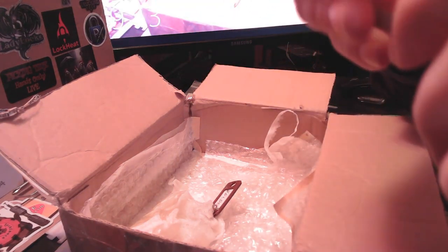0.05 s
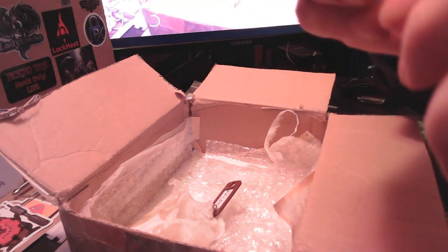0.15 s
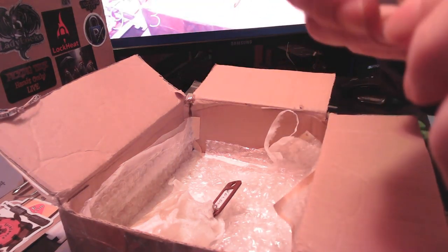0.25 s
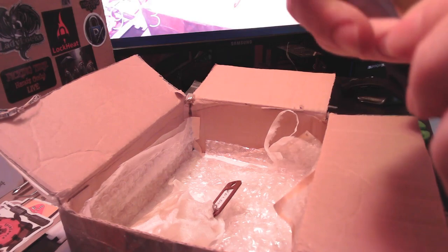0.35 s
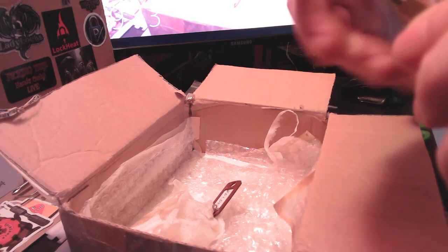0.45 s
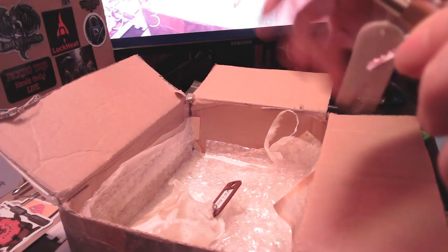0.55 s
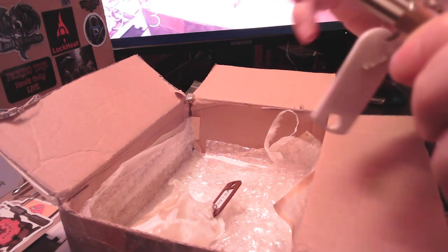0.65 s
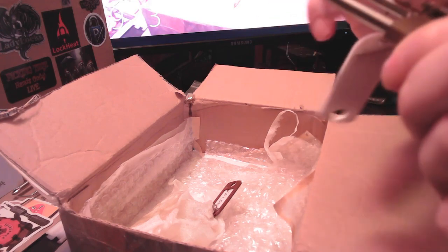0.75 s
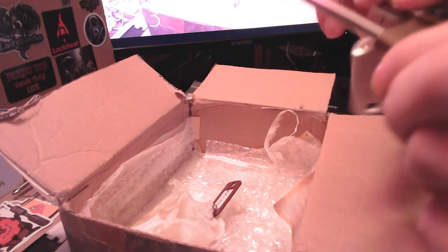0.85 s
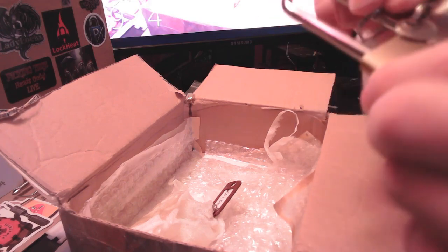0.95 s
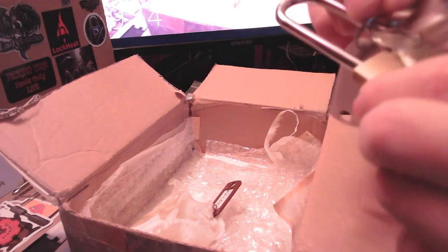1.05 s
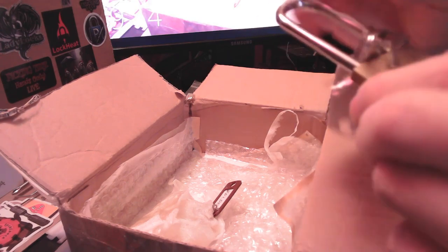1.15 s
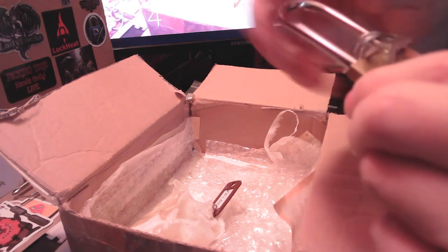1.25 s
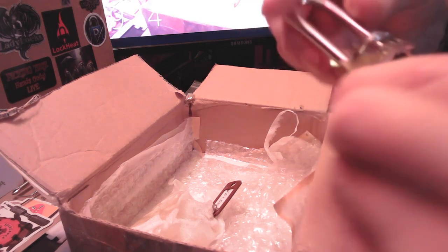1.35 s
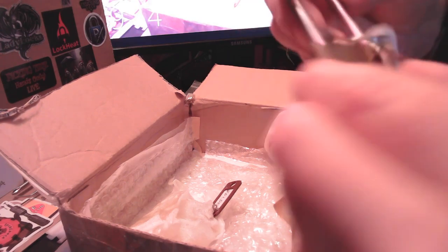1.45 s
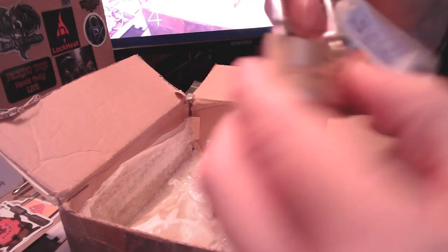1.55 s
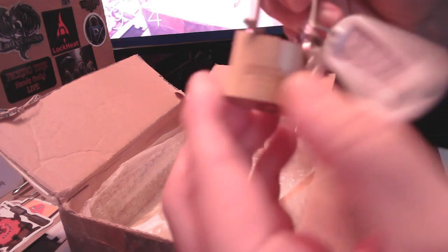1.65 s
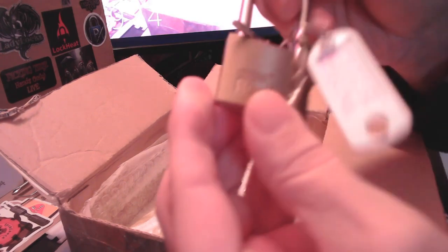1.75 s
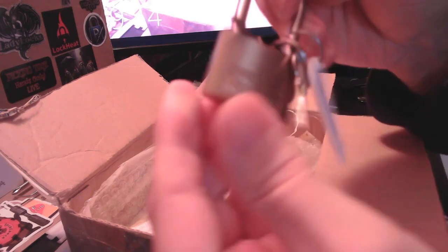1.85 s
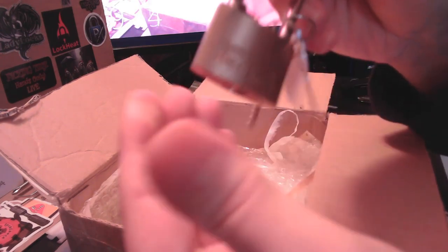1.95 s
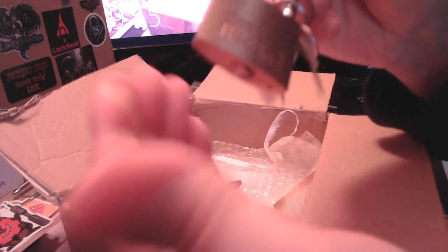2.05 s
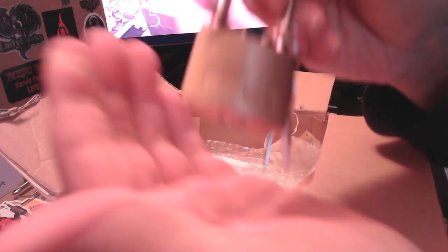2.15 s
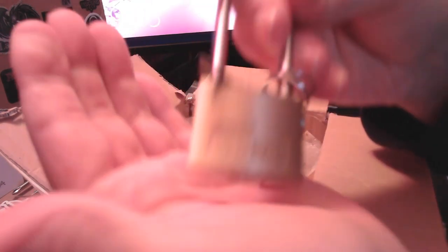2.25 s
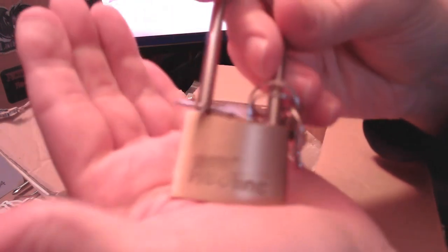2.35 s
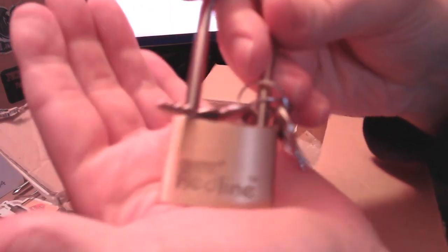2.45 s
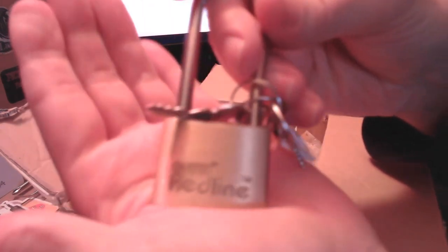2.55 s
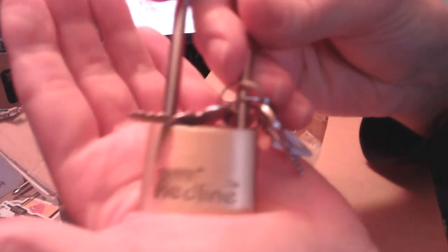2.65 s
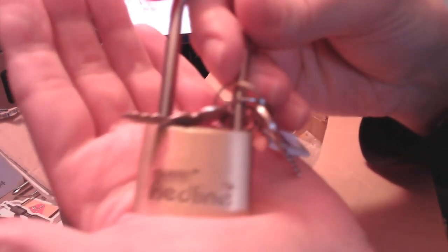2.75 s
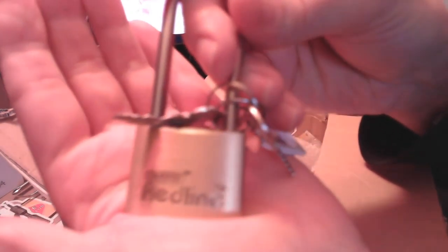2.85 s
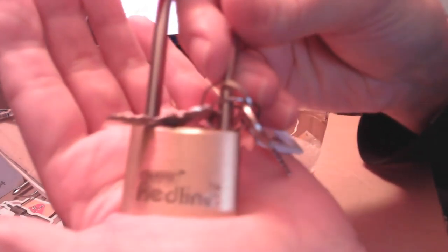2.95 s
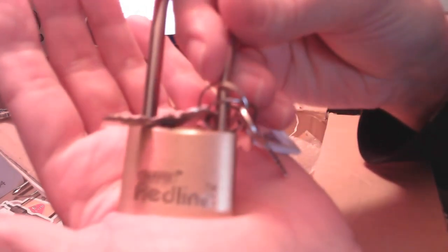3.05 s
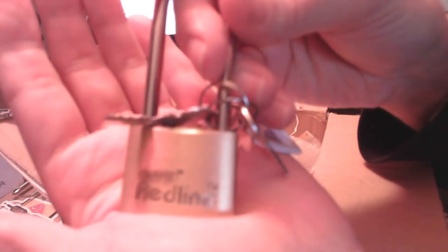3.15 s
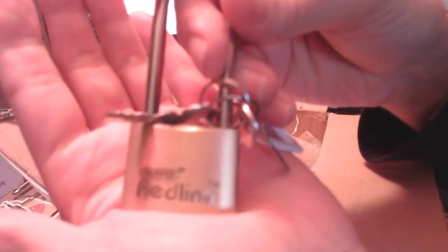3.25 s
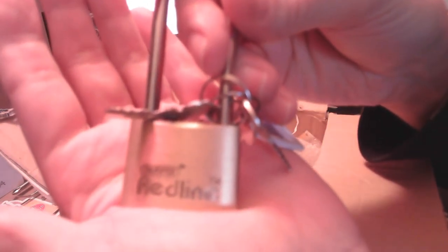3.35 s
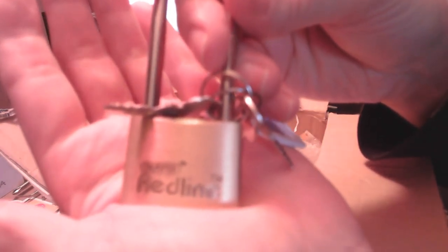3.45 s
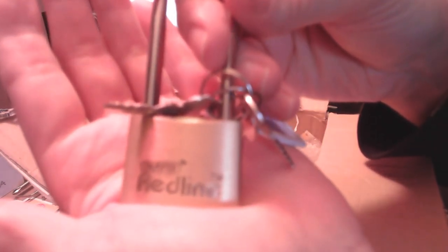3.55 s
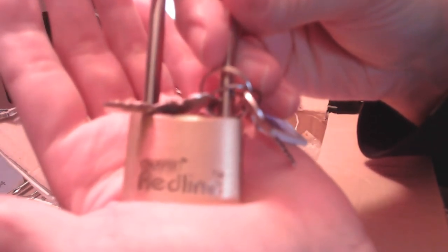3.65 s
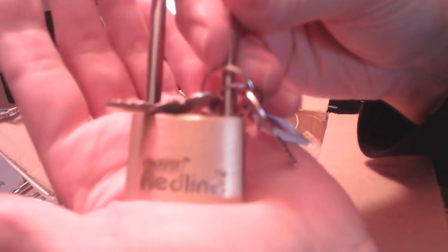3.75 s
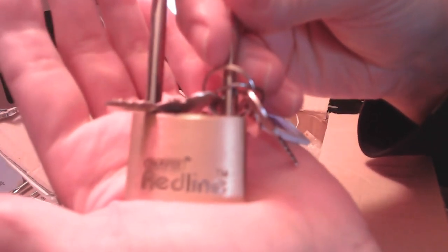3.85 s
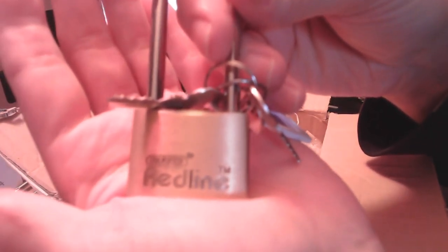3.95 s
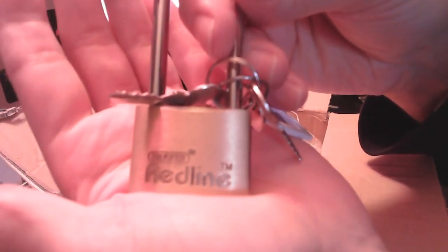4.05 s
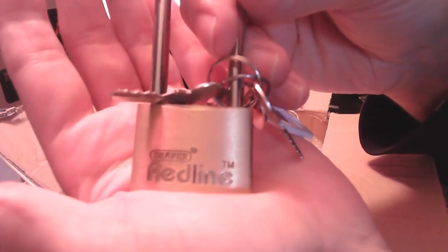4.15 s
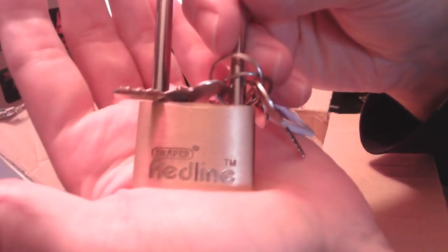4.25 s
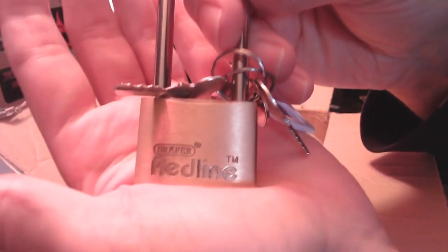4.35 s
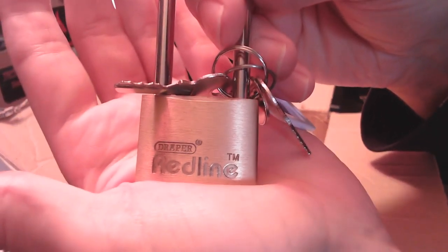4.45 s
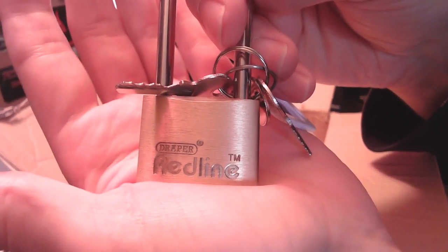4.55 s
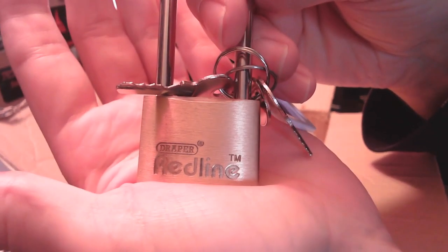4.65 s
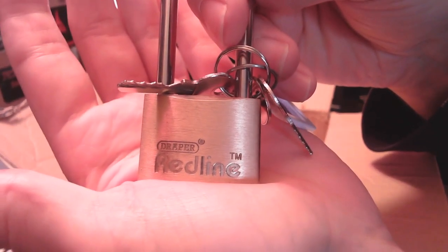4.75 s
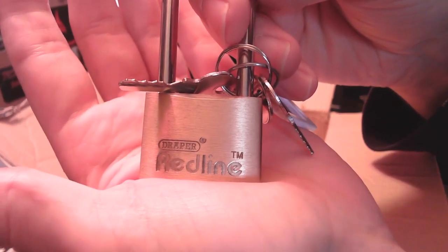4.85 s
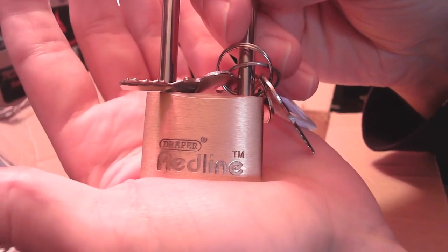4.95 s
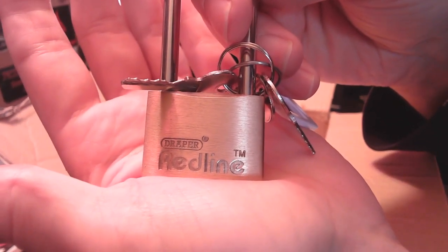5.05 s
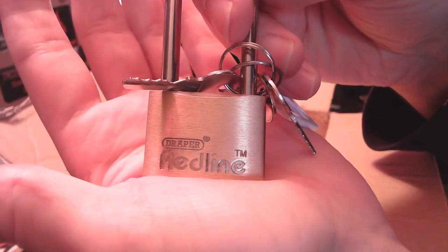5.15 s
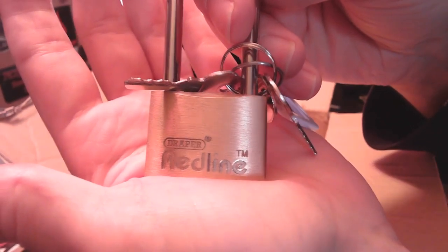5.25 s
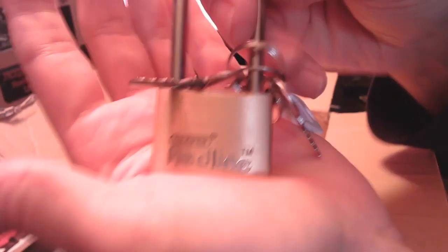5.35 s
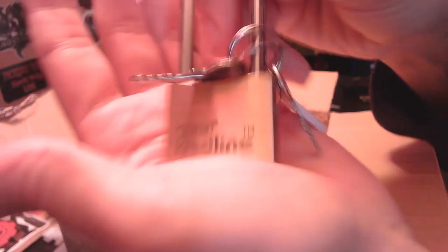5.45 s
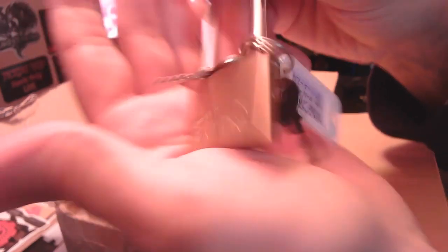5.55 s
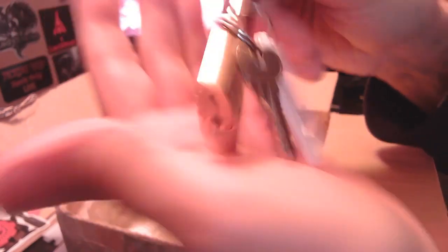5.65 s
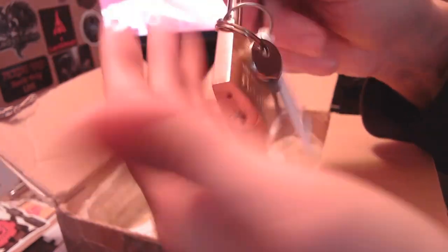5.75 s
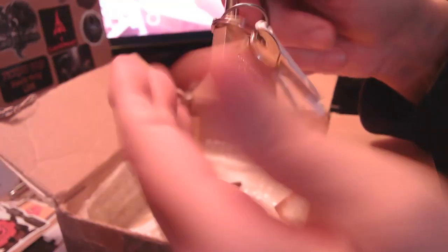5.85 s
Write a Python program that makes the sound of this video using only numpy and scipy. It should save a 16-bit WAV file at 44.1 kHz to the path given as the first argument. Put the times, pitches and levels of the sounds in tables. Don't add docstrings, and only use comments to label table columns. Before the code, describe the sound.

Small thin keys on a ring jingle and click sharply against a brass padlock, pause, then rattle again over a faint room hum.

```python
import sys
import numpy as np
from scipy import signal
from scipy.fft import rfft, irfft, next_fast_len
from scipy.io import wavfile
from scipy.ndimage import uniform_filter1d, map_coordinates

SR = 44100
rng = np.random.default_rng(int(sys.argv[2]) if len(sys.argv) > 2 else 0)


def put_to_file(sound):
    columns = np.atleast_2d(sound).T
    safe = np.clip(columns, -1, 1)
    whole_steps = np.round(safe * 32767)
    wavfile.write(sys.argv[1], SR, whole_steps.astype(np.int16))


def invert_db(x):
    u = np.asarray(x, float) / 20
    return 10 ** u


N = 260039

# pitch_hz, level_db (per Hz)
AIR_COLOUR = [(15, -58), (25, -2), (108, -7), (167, -11.5), (273, -13), (358, -11.5), (422, -16.5),
              (1060, -23.5), (1150, -24), (1470, -25), (1980, -28.5), (2150, -28.5), (2330, -30.5),
              (13300, -48), (16500, -48)]
AIR_DB = -53.5
# pitch_hz, likeness (1 = the same)
LIKENESS = [(60, 0.48), (180, 0.94), (550, 0.87), (1650, 0.58), (4970, 0.34), (15000, -2.5)]
# pitch_hz, level_db, waver_db
HUM_TONES = [(59.5, -61, 1.5), (118.6, -66, .8), (120.4, -54, .8), (360.8, -54, .5), (619, -76, 1.5),
             (722, -80, 1.5), (1082, -79, 1.5), (1443, -80, 1.5), (1803, -84, 1.5), (2116, -80, 1.5),
             (7833, -99, 1.5)]
# pitch_hz, width_hz, level_db
DRONES = [(44.5, 5.3, -53), (75.24, 2, -55.5), (87.7, 10, -62), (199, 5, -74), (12970, 530, -100)]

# start_s, level_db, hold_s
JOLTS = [
    (0, -29.5, .02),
    (0.642, -30, 0.047),
    (1.237, -32.5, 0.068),
    (1.942, -36.5, .04),
    (2.97, -41.5, 0.0099),
    (4.097, -44, 0.011),
    (4.926, -36, 0.062),
    (5.603, -29.5, 0.033),
]
DESK_HZ, DESK_REST_DB = 17.5, -55
JOLT_RISE_DB_S, JOLT_FALL_DB_S = 120, 79.5

# start_s, peak_s,
# end_s, scrape_db, ring_db
SWINGS = [(.06, 0.127, .27, -68, -79), (.33, 0.445, .47, -63, -67), (0.46, 0.477, .55, -59, -54),
          (0.49, 0.537, .6, -57, -41), (.55, 0.62, 0.696, -60, -47), (.67, 0.75, .84, -56.5, -50),
          (0.844, .865, 0.895, -55, -56), (.92, .93, 0.97, -61, -57), (1.0, 1.043, 1.0958, -72, -80),
          (1.162, 1.24, 1.318, -50.5, -45.5), (1.32, 1.385, 1.4022, -56.5, -52),
          (1.405, 1.408, 1.45, -58, -49), (1.406, 1.471, 1.539, -46.5, -24.5),
          (1.47, 1.505, 1.637, -51.5, -38), (1.644, 1.659, 1.7233, -53, -45),
          (1.67, 1.813, 1.875, -51.5, -51), (1.88, 1.887, 1.974, -54.5, -57),
          (1.94, 1.96, 2.036, -53.5, -77), (2.028, 2.173, 2.199, -60, -74),
          (2.194, 2.21, 2.297, -55.5, -41), (2.323, 2.34, 2.4073, -58, -72),
            (2.396, 2.47, 2.547, -53.5, -60), (2.53, 2.585, 2.603, -50, -75),
            (2.594, 2.617, 2.683, -45, -60), (2.64, 2.69, 2.7315, -47.5, -62),
            (2.62, 2.725, 2.795, -57.5, -51), (2.8, 2.9, 3.3, -66, -86), (3.6, 3.67, 3.7697, -65.5, -97),
            (5.02, 5.06, 5.105, -72, -99), (5.636, 5.739, 5.8, -49, -57), (5.805, 5.813, 6.1, -47.5, -35.5)]
SCRAPE_EDGE_DB, RING_EDGE_DB = 12, 22.5
START_STEEP, STILL_STEEP = 15, 2.6
# pitch_hz, level_db (per Hz)
SCRAPE_COLOUR = [(700, -22), (1500, 1), (3000, 2.5), (4500, 2.5), (6500, 2.5), (10000, -3), (13000, -4),
                 (15600, -3)]

# pitch_hz, level_db, t60_s (while rattling)
BOWS = [(11990, -4, .2), (12060, -5, .15), (12150, -2, .12), (12330, -10, .1), (12480, -4, .18),
        (12545, -3, .2), (12650, -2, .15), (12710, -3, .15), (13050, -12, .1)]
# pitch_hz, level_db, t60_s (while rattling)
BLADES = [(10340, -6, .15), (10540, -6, .1), (10600, 0, .15)]
# pitch_hz, level_db, t60_s (while rattling)
BENDS = [(3650, -5, .04), (3730, -2, .06), (3850, 0, .06), (3920, -2, .05), (3980, -2, .05),
         (4150, -4, .04), (4280, -7, .03)]
BLADE_RATTLE_DB, BEND_RATTLE_DB, JOSTLE_DB = -4.5, -6, 4
BEND_SHARE = 0.5

# start_s, crack_db (peak), blade_db, bow_db
LONG_KEY = [(0.108, -45, -64, -50), (.1224, -52, -58, -71), (.198, -60, -56.5, -69),
            (0.4675, -42.5, -48, -48), (.5761, -50, -52, -48.5), (.714, -47.5, -60, -59),
            (0.7562, -39, -62, -41.5), (0.863, -45, -78, -50.5), (1.4685, -25, -40, -37),
            (1.6337, -50, -70, -48), (1.8004, -60, -49, -49), (1.8104, -46, -54, -46),
            (1.8308, -37, -60, -38), (2.203, -33, -31, -35), (2.2162, -31.5, -37.5, -32),
            (2.2494, -39.5, -45, -35.5), (2.4407, -54, -61, -62), (2.5967, -26.5, -55, -41),
            (2.617, -33.5, -47, -41), (2.6438, -60, -54, -44), (2.7447, -42.5, -67, -44),
            (5.732, -37, -47, -45)]
# start_s, crack_db (peak), blade_db, bow_db
SHORT_KEY = [(0.1577, -43.5, -48, -57), (0.4886, -41, -47, -47), (0.5404, -41.5, -48, -42),
             (0.5957, -29.5, -41, -28.5), (.6194, -45, -41, -50), (.6864, -48, -59, -52),
             (.6974, -67, -54, -52), (.7724, -41, -64, -43), (1.041, -42, -47.5, -47),
             (1.179, -55, -55, -56), (1.197, -45, -56, -57), (1.2155, -28.5, -31.5, -36),
             (1.235, -31, -37, -29.5), (1.2724, -30, -36, -36), (1.4077, -34, -34, -31.5),
             (1.5182, -33, -35, -41), (1.7464, -38, -61, -53), (1.7656, -36.5, -48, -53),
             (1.9035, -41.5, -50, -52), (1.9536, -37, -41, -52), (2.1905, -38.5, -58, -48),
             (2.462, -47, -57, -52), (2.6892, -42, -51, -48), (5.7383, -39.5, -50, -60),
             (5.768, -43, -51, -45), (5.788, -43, -42, -47), (5.8097, -35, -27.5, -28),
             (5.8197, -34.5, -49, -37.5), (5.8308, -33, -52, -41), (5.878, -32.5, -33, -44)]
# start_s, crack_db (peak)
TICKS = [(.214, -49.5), (.82, -48.5), (.8707, -41), (1.02, -54), (1.1199, -57), (1.1714, -64),
         (1.3064, -63), (1.6644, -45), (1.7202, -33), (1.774, -37), (1.971, -43), (2.024, -48),
         (2.0492, -43), (2.0854, -49), (2.141, -55), (2.285, -50.5), (2.326, -45.5), (2.368, -45.5),
         (2.6051, -43), (2.6726, -40), (2.7773, -44.5), (2.8036, -51), (2.8985, -55.5), (5.6376, -48),
         (5.6534, -48), (5.696, -40.5)]
TICK_BLADE_DB, TICK_BOW_DB = -27, -21.5
LONG_T60_S, SHORT_T60_S = 0.12, 0.063
BAR_RATIO, FIRST_BEND_DB = 2.756, -8.5
RING_T60_S, CHOKE_DB_PER_DB = 0.056, 0.14
# pitch_hz, level_db (per Hz)
CRACK_COLOUR = [(1500, -16.5), (3200, -7), (4200, 1.5), (8000, 2), (12500, -3), (15600, -1.5)]

# start_s, level_db (peak), pitch_hz, width_octaves, crack_db
KNOCKS = [(0.396, -37, 4400, 1.1, -58), (.404, -45.5, 4470, .75, -64), (.41, -48, 4301, .9, -62),
          (0.8558, -36.5, 2250, 0.48, -48), (0.9236, -22.5, 3499, 1.9007, -28), (.935, -56, 4290, 1.4, -52),
          (1.89, -44, 550, 0.29, -75), (1.912, -23.5, 2400, 1.948, -48), (2.3485, -29.5, 1940, 1.045, -59),
          (2.4066, -40.5, 2000, 1.197, -62), (2.4832, -28, 2200, 3.2995, -53),
          (2.498, -40, 4821, 0.68, -55), (2.725, -31.5, 4270, 0.41, -23),
          (3.2294, -42.5, 1400, 1.0963, -80), (4.6264, -50, 2800, 0.55, -71),
          (5.651, -41.5, 2550, .56, -57), (5.7178, -30.5, 2320, .45, -43.5), (5.745, -35, 2280, 0.47, -46)]
THUD_DB = 7.5

# start_s, left_louder_db, left_earlier_samples
HAND = [
    (0, 3, 1.54),
    (.5, 3.5, 3.46),
    (1.9, 3, 3.06),
    (2.3, 3.5, 0.65),
    (2.7, 1.5, 0.97),
    (5.9, 1.5, 0.98),
]
ROOM_T60_S, ROOM_DB = 0.11, -10


def rms_one(x):
    return x / np.sqrt(np.mean(x ** 2) + 1e-20)


def in_time(rows, outside=None):
    s, *columns = np.transpose(rows)
    return [np.interp(np.arange(N) / SR, s, column, outside, outside) for column in columns]


def at_hz(points, hz):
    point_hz, value = np.transpose(points)
    return np.interp(np.log(hz + 1), np.log(point_hz + 1), value)


def coloured(x, spectrum):
    size = next_fast_len(N)
    gain = invert_db(at_hz(spectrum, np.fft.rfftfreq(size, 1 / SR)))
    return irfft(rfft(x, size) * gain, size)[..., :N]


def drift(rate_hz):
    points = rng.standard_normal(400)
    return np.interp(np.arange(N) / SR * rate_hz, np.arange(len(points)), points)


def ring(x, hz, t60):
    r = invert_db(-60 / (t60 * SR))
    w = 2 * np.pi * hz / SR
    return signal.lfilter([0, np.sin(w)], [1, -2 * r * np.cos(w), r * r], x + 1e-18)


def add(out, s, x):
    at = round(s * SR)
    out[:, at:at + x.shape[-1]] += x[..., :N - at]


def air():
    size = next_fast_len(N)
    hz = np.fft.rfftfreq(size, 1 / SR)
    alike = np.clip(at_hz(LIKENESS, hz), 0, 1)
    mid, side = rfft(rng.standard_normal((2, size))) * invert_db(at_hz(AIR_COLOUR, hz))
    pair = np.sqrt(1 + alike) * mid + np.sqrt(1 - alike) * side * [[1], [-1]]
    return invert_db(AIR_DB) * rms_one(irfft(pair, size)[:, :N])


def hum():
    t = np.arange(N) / SR
    out = np.zeros(N)
    for hz, db, waver_db in HUM_TONES:
        level = np.sqrt(2) * invert_db(db + waver_db * drift(2.9))
        out += level * np.sin(2 * np.pi * (hz * t + rng.random()))
    for hz, width_hz, db in DRONES:
        t60 = np.log(1000) / np.pi / width_hz
        out += invert_db(db) * rms_one(ring(rng.standard_normal(N), hz, t60))
    return out


def desk():
    t = np.arange(N) / SR
    level_db = DESK_REST_DB
    for s, db, hold in JOLTS:
        drop_db = np.maximum(JOLT_RISE_DB_S * (s - t), JOLT_FALL_DB_S * (t - s - hold)).clip(0)
        level_db = np.maximum(level_db, db - drop_db)
    turns = np.cumsum(DESK_HZ * (1 + 0.14 * drift(5.5))) / SR
    shake = np.sqrt(2) * invert_db(level_db) * np.sin(2 * np.pi * turns)
    return shake * invert_db(np.array([[1.5], [-1.5]]))


def swing_levels():
    start, peak, end, scrape_db, ring_db = np.transpose(SWINGS)[:, :, None]
    t = np.arange(0, N, 32) / SR
    away = np.maximum((peak - t) / (peak - start), (t - peak) / (end - peak))
    steep = np.where(t < peak, START_STEEP, STILL_STEEP)
    away = away + steep * np.clip(away - 1, 0, None)
    levels = np.max([scrape_db - SCRAPE_EDGE_DB * away, ring_db - RING_EDGE_DB * away], axis=1)
    return in_time(np.transpose([t, *levels]))


def grains(per_s, spread_db):
    out = np.zeros(N)
    place, size, sign = rng.random((3, per_s * N // SR))
    at = (place * N).astype(int)
    sizes_db = spread_db * np.minimum(-np.log(size + 1e-9), 4) + 3.5 * drift(55)[at]
    out[at] = invert_db(sizes_db) * np.sign(sign - .5)
    return out


def evened(x):
    return x / np.sqrt(uniform_filter1d(x ** 2, size=2500) + 1e-12)


def jostled(modes):
    pair = np.zeros((2, N))
    for k, (hz, db, t60) in enumerate(modes):
        touches = grains(300, spread_db=3.0) * invert_db(db + 9 * drift(12))
        x = ring(touches, hz, .45 * t60)
        pair += np.array([x, np.roll(x, k % 3 + 1)])
    return evened(pair) * invert_db(5 * drift(45))


def rattle():
    scrape_db, ring_db = swing_levels()
    bend_db = BEND_RATTLE_DB + scrape_db + BEND_SHARE * (ring_db - scrape_db)
    shared = grains(2500, spread_db=4.5)
    own = np.array([grains(5000, spread_db=2.5), grains(5000, spread_db=2.5)])
    scrape = invert_db(scrape_db - 0.5) * rms_one(coloured(shared + 1.46 * own, SCRAPE_COLOUR))
    bends = invert_db(bend_db) * jostled(BENDS)
    keys = invert_db(BLADE_RATTLE_DB) * jostled(BLADES) + jostled(BOWS)
    return scrape + bends + invert_db(ring_db - JOSTLE_DB) * keys


def crack(noise, tail_db, t60):
    fade = invert_db(tail_db - 60 * np.arange(noise.shape[1]) / SR / t60)
    spray = (noise[0] + 1.01 * noise[1:]) * fade
    spray[:, 0] = 1
    return spray


def dying(hz, db, t60, phase):
    t = np.arange(int(t60 * SR)) / SR
    waves = np.sin(2 * np.pi * (hz[:, None] * t + phase[:, :, None]))
    return np.sum(invert_db(db)[:, None] * waves, axis=1) * invert_db(-60 * t / t60)


def clinks():
    rings, cracks = np.zeros((2, 2, N))
    bow_hz, bow_level_db, _ = np.transpose(BOWS)
    ticks = [(s, db, db + TICK_BLADE_DB, db + TICK_BOW_DB) for s, db in TICKS]
    long_touches = [(*row, BLADES[0][0], LONG_T60_S) for row in LONG_KEY]
    short_touches = [(*row, BLADES[2][0], SHORT_T60_S) for row in SHORT_KEY + ticks]
    for s, crack_db, blade_db, bow_db, hz, blade_t60 in sorted(long_touches + short_touches):
        luck = rng.random((4, len(BOWS)))
        noise = rng.standard_normal((3, 1300))
        add(cracks, s, invert_db(crack_db + 10.5) * crack(noise, tail_db=-11, t60=0.018))
        blade_hz = np.array([hz, hz / BAR_RATIO])
        blade_levels_db = blade_db + np.array([0, FIRST_BEND_DB])
        add(rings, s, dying(blade_hz, blade_levels_db, blade_t60, .25 * luck[:2, :2]))
        bow_t60 = np.clip(RING_T60_S * invert_db(-CHOKE_DB_PER_DB * (bow_db + 55)), .03, .12)
        bow_levels_db = bow_db - 4 + bow_level_db + 26 * (luck[0] - .5)
        add(rings, s, dying(bow_hz, bow_levels_db, bow_t60, luck[1] + .5 * luck[2:]))
    return rings + coloured(cracks, CRACK_COLOUR)


def knocks():
    bodies, bright, thud = np.zeros((3, 2, N))
    for s, db, hz, octaves, crack_db in KNOCKS:
        blow = crack(rng.standard_normal((3, 1300)), tail_db=-13.5, t60=0.011)
        half = 2 ** (np.clip(octaves, .3, 3.5) / 2)
        body_band = signal.butter(2, [hz / half, hz * half], "band", fs=SR, output="sos")
        body = signal.sosfilt(body_band, blow)
        add(bodies, s, invert_db(db) * body / np.max(abs(body)))
        add(bright, s, invert_db(crack_db) * blow)
        add(thud, s, invert_db(db + THUD_DB) * blow)
    palm_band = signal.butter(2, [1000, 2400], "band", fs=SR, output="sos")
    return bodies + coloured(bright, CRACK_COLOUR) + signal.sosfilt(palm_band, thud + 1e-18)


def placed(x):
    pan_db, lead = in_time(HAND)
    late = map_coordinates(x[1], [np.arange(N) - lead], order=3)
    direct = np.array([x[0] * invert_db(pan_db / 2), late * invert_db(-pan_db / 2)])
    t = np.arange(SR // 2) / SR
    tail = rng.standard_normal((2, len(t))) * (t > .004) * invert_db(-60 * t / ROOM_T60_S)
    tail = invert_db(ROOM_DB) * tail / np.linalg.norm(tail[0])
    return direct + signal.fftconvolve(direct, tail, axes=1)[:, :N]


def scene():
    room = air() + hum() + desk()
    return room + placed(rattle() + clinks() + knocks())


def top_cut(x):
    return signal.sosfilt(signal.butter(12, 16680, fs=SR, output="sos"), x)


def record(dry):
    low_pass = signal.cheby2(12, 28, 16150, fs=SR, output="sos")
    mix = signal.sosfilt(low_pass, dry)
    return top_cut(mix)


dry = scene()
out = record(dry)
put_to_file(out)
```